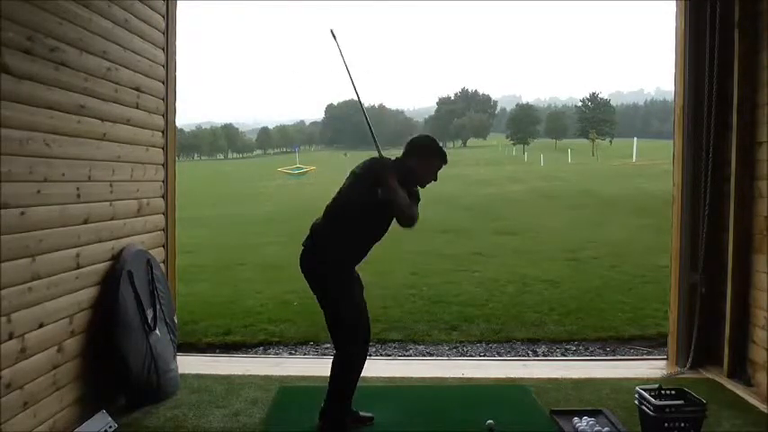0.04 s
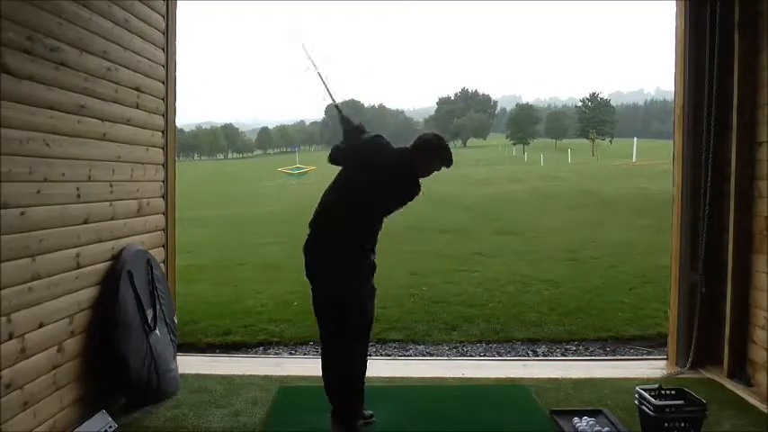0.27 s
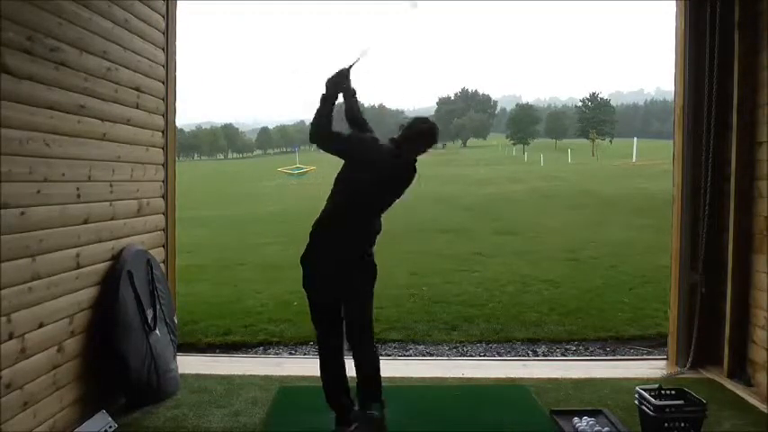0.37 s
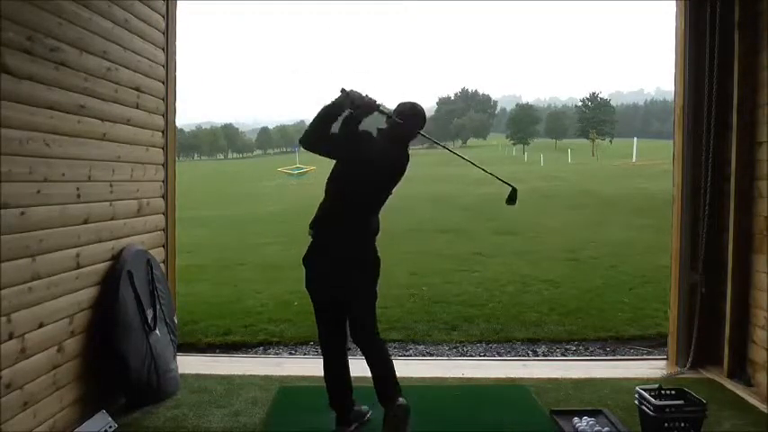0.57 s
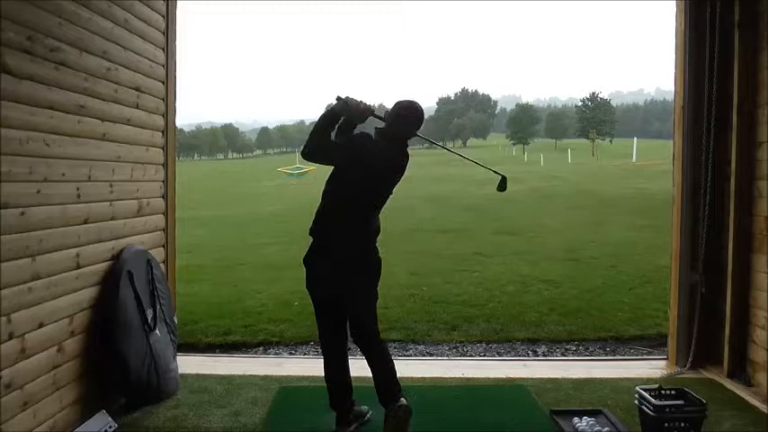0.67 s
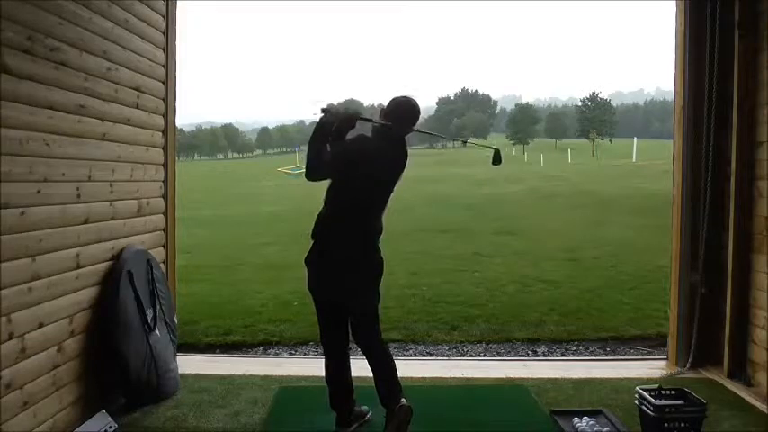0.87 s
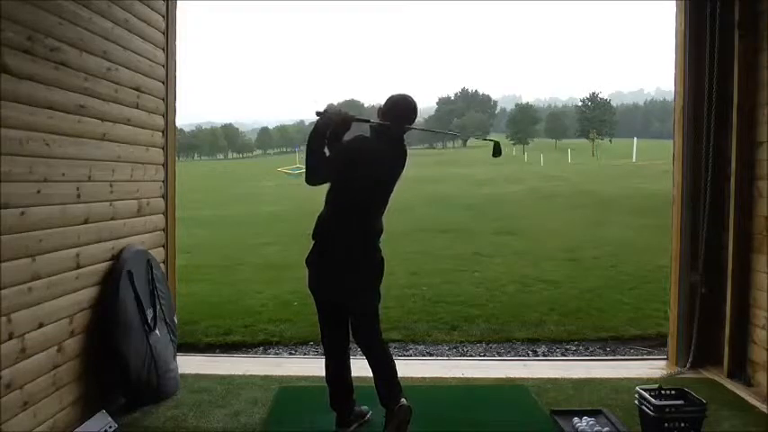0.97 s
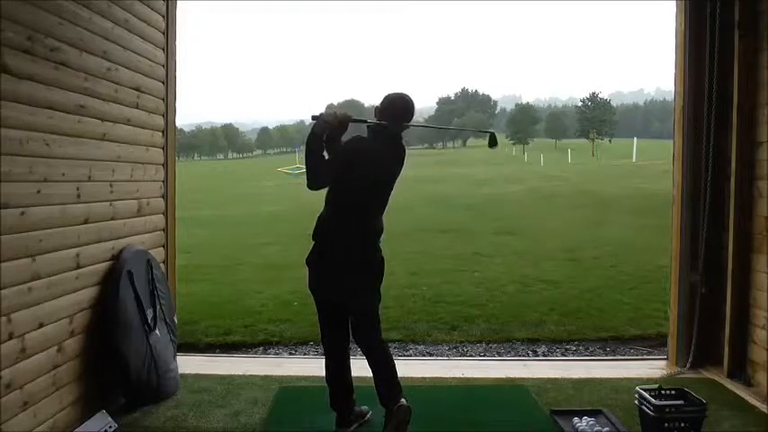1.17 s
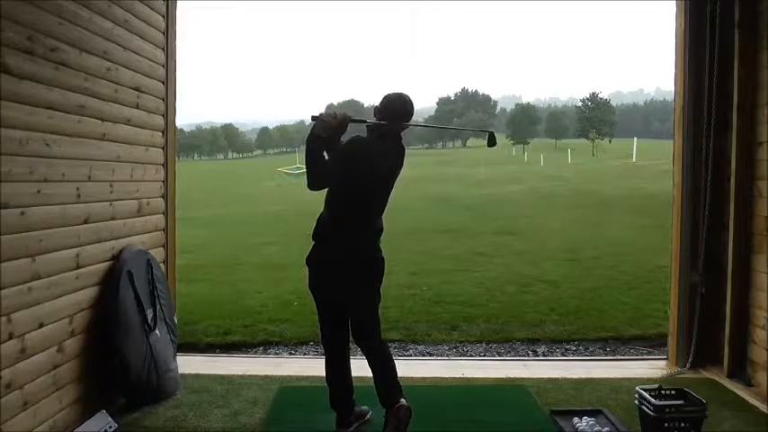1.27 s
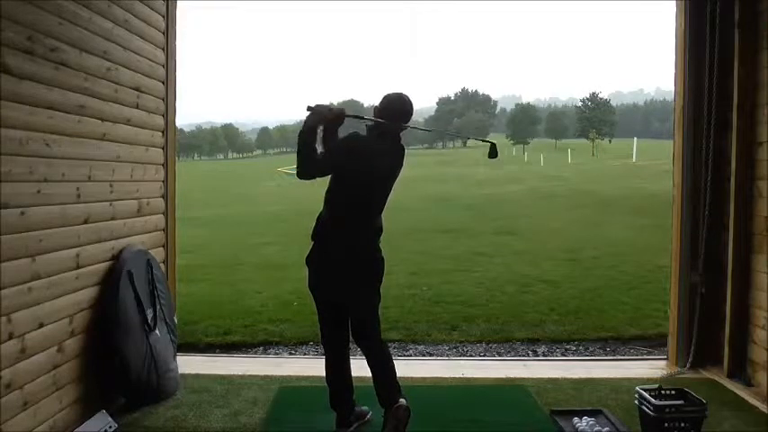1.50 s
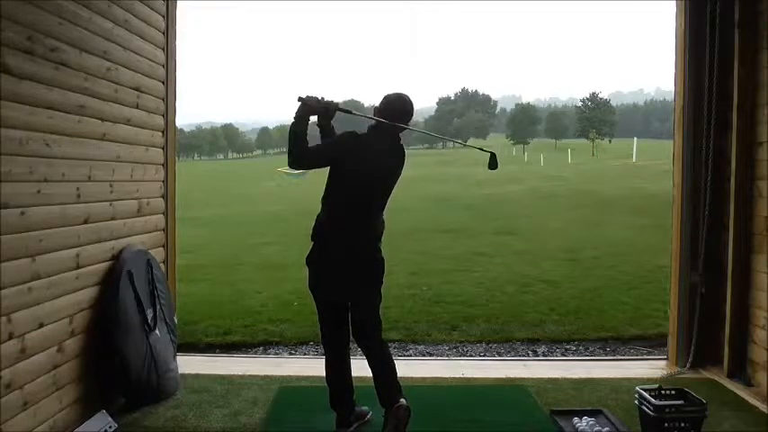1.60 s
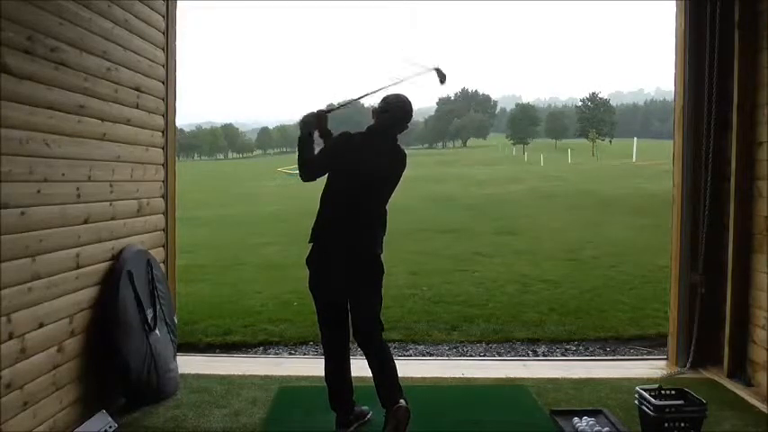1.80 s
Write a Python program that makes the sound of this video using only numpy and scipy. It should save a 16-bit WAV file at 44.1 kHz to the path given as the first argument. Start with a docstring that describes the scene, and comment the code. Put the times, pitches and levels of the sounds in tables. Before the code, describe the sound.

Golf shot: fast rising swish, sharp crack of ball and mat, short woody echo, faint birds after

```python
"""Golf strike in a timber bay

At the microphone pair in an open timber bay, a club's shaft sheds vortices in a rising whoosh (tone and noise).
The head cracks into the ball and scuffs the mat (noise bursts, damped sines); the walls ring on (decaying noise).
Outside are a soft wash of air and far traffic (coloured noise), drips from the eaves and birds (gliding sines).
The recorder's gain turns down after the blow and recovers slowly."""
import sys
import numpy as np
from scipy import signal
from scipy.fft import rfft, irfft, next_fast_len
from scipy.io import wavfile
from scipy.ndimage import uniform_filter1d, map_coordinates

SR = 44100
rng = np.random.default_rng(int(sys.argv[2]) if len(sys.argv) > 2 else 0)


def field_ratio(decibels):
    """Amplitude ratio for a level in dB (20 dB per decade); scalars and array-likes work."""
    return 10 ** (np.asarray(decibels, dtype=float) / 20)


def persist_wave(psi):
    """Save psi, clipped to +-1, as 16-bit WAV."""
    counts = np.round(np.clip(psi, -1, 1) * 32767).astype(np.int16)
    wavfile.write(sys.argv[1], SR, np.atleast_2d(counts).T)


N = 81585

# the shaft's whoosh through the downswing: (time [s], level [dB], vortex pitch [Hz])
SWING = [(0.129, -49.5, 300), (.15, -44.5, 330), (.162, -35.5, 349.5), (.171, -50, 368),
         (0.179, -32, 413.6), (.192, -34.5, 447), (.202, -21, 523), (.213, -20.5, 555.6),
         (.225, -12, 596.5), (.229, -19.5, 601), (.234, -14, 610.3), (.243, -16.5, 621.5),
         (0.2485, -6.5, 638), (0.2527, -14, 621)]
# hiss of air round the head: (frequency [Hz], relative level per Hz [dB])
HEAD_AIR = [(250, -32.5), (500, 0), (900, 0.5), (2000, -7.5), (2900, -17), (3500, -13), (6450, -16),
            (11800, -27.5), (15900, -43)]
# how alike the hiss is at the two microphones: (frequency [Hz], likeness [0-1])
WHOOSH_ALIKE = [(300, 1), (1400, 0.81), (7000, 0.72), (15000, .1)]
LEAD_DB_PER_S = 120  # swell before the first point of the swing
STOP_S, STOP_DB = 0.0035, 7.8  # once the ball is struck, fades by STOP_DB every STOP_S
TONE_FROM_S, TONE_GROWS_S = 0.13, 0.02  # shedding locks into a tone once the shaft is fast enough
WAVER_RAD = 0.8  # uneven shedding
FLUTTER_HZ, FLUTTER_DB = 210, -1.5  # speed of the flutter round the tone, level against the tone
HISS_AGAINST_TONE_DB = -10  # at the loudest point of the swing
HISS_GROWTH = 0.65  # dB of hiss per dB of tone
WHOOSH_CUT_HZ = 294  # the thin shaft radiates little below this


def whoosh():
    """Vortices shed by the shaft: a wavering tone, flutter around it and hiss, all following the swing."""
    t = np.arange(N) / SR
    s, db, hz = np.transpose(SWING)
    lead_db = LEAD_DB_PER_S * np.clip(s[0] - t, 0, None)
    stop_db = STOP_DB * np.clip(t - s[-1], 0, None) / STOP_S
    level_db = np.interp(t, s, db) - lead_db - stop_db
    locked = 1 / (1 + np.exp((TONE_FROM_S - t) / TONE_GROWS_S))

    carrier = np.exp(2j * np.pi * np.cumsum(np.interp(t, s, hz)) / SR)
    tone = np.sqrt(2) * np.real(carrier * np.exp(1j * WAVER_RAD * wobble(129.4)))

    # one flutter shared by both microphones, plus one of its own for each
    knots = 2 * FLUTTER_HZ
    flutter = np.array([np.real(carrier * (wobble(knots) + 1j * wobble(knots))) for _ in range(3)])
    flutter = unit(flutter[0] + 0.5 * flutter[1:])

    hiss_db = HISS_AGAINST_TONE_DB + (HISS_GROWTH - 1) * (level_db - db.max())
    hiss = rush(HEAD_AIR, WHOOSH_ALIKE, patchy_db=0.5) * field_ratio(hiss_db)
    whole = locked * (tone + field_ratio(FLUTTER_DB) * flutter) + hiss
    return high_pass(field_ratio(level_db) * whole, WHOOSH_CUT_HZ)


# contacts of the head with ball and mat: (time [s], level [dB], burst decay [s])
BLOWS = [(0.2523, -12.5, 0.0012), (0.2532, -1.5, 0.0017), (0.2557, -5.5, 0.0019), (.2575, -9.5, .003)]
# colour of each gritty burst: (frequency [Hz], relative level per Hz [dB])
CRACK = [(100, -43), (200, -7.5), (500, -8), (1860, -3.5), (3900, -7.5), (6100, -6), (8200, -9),
         (11200, -16.5), (13000, -14.5), (15500, -16), (16500, -60)]
# how alike the bursts are at the two microphones: (frequency [Hz], likeness [0-1])
CRACK_ALIKE = [(200, 0.45), (1000, 0.74), (5000, .85), (9000, .4), (13000, 0.7)]
# ringing modes of the club head: (frequency [Hz], relative level [dB], t60 [s])
HEAD = [(1044, -7.5, .02), (1440, 0.5, .02), (1970, -9, .025), (6140, 0, 0.021), (12860, -6, .008)]
# thud of mat and floor: (frequency [Hz], level [dB], t60 [s])
THUD = [(190, -16, .035), (260, -20, .025)]
# cross mode of the bay: (frequency [Hz], level [dB], t60 [s])
BOOM = [(99.1, -23.5, .38)]
THUD_START_S = 0.2535
THUD_LEFT = -0.2  # the thud reaches the left microphone weak and reversed
BOOM_START_S, BOOM_RISE_S = 0.258, 0.021
BOOM_LEFT = -0.3  # the boom is opposed at the two microphones
BLOW_CUT_HZ = 130  # the small head radiates little below this


def strike():
    """Each contact is a gritty burst that also rings the head; the mat thuds and the bay booms."""
    t = np.arange(N) / SR
    blow = ring(THUD, THUD_START_S, attack_s=0.002) * [[THUD_LEFT], [1]]
    for s, db, burst_s in BLOWS:
        age = np.clip(t - s, 0, None)
        envelope = (1 - np.exp(-age / 0.00024)) * np.exp(-age / burst_s)
        grit = rush(CRACK, CRACK_ALIKE, patchy_db=2) * envelope
        blow = blow + field_ratio(db) * (grit + 0.3 * ring(HEAD, s, attack_s=0.0002))
    boom = ring(BOOM, BOOM_START_S, BOOM_RISE_S) * [[BOOM_LEFT], [1]]
    return high_pass(blow, BLOW_CUT_HZ) + boom


WHOOSH_BAY_DB = -23


def bay(air):
    """The whoosh and each contact, taken as an impulse of the burst's energy, echo in the bay."""
    out = field_ratio(WHOOSH_BAY_DB) * signal.fftconvolve(air.mean(0)[None], bay_tail(), axes=1)[:, :N]
    for s, db, burst_s in BLOWS:
        impulse = field_ratio(db) * np.sqrt(burst_s * SR / 2)
        out = out + impulse * delayed(bay_tail(), s)
    return out


# how long the timber walls ring: (frequency [Hz], t60 [s])
BAY = [(100, 1), (300, 0.63), (600, 0.49), (1000, 0.51), (3000, .4), (7000, 0.37), (12000, 0.27),
       (16000, 0.18)]
# colour of the walls' answer: (frequency [Hz], relative level [dB])
BAY_COLOUR = [(100, -16), (250, -7.5), (600, -0.5), (2000, 3), (3000, -1.5), (5000, 2), (9000, -4.5),
              (12000, -12.5), (15500, -22)]
# how alike the answer is at the two microphones: (frequency [Hz], likeness [0-1])
BAY_ALIKE = [(100, 0.87), (640, 0.88), (1400, .65), (7000, 0.73), (15000, 0)]
BAY_GAP_S, BAY_FILL_S = 0.004, 0.0047  # wait for the first answer, time to fill


def bay_tail():
    """The timber walls' answer to an impulse; each frequency dies at its own speed."""
    hz, t, z = signal.stft(rng.standard_normal((2, N + 256)), SR, nperseg=256)
    decay = field_ratio(-60 * t / along(BAY, hz)[:, None])
    tail = signal.istft(z * decay, SR, nperseg=256)[1][:, :N]
    tail = tail * (1 - np.exp(-np.arange(N) / SR / BAY_FILL_S))
    tail = paired(delayed(tail, BAY_GAP_S), BAY_COLOUR, BAY_ALIKE)
    return tail / np.linalg.norm(tail[0])


# hollow drips from the eaves: (time [s], level [dB], pitch [Hz])
DRIPS = [(1.372, -37.5, 800), (1.555, -40, 330), (1.745, -50, 1054), (1.785, -38, 1026), (1.832, -40, 1065)]
DRIP_T60_S = 0.073


def drips():
    """Short soft-edged plops, each one damped sine."""
    return sum(ring([(hz, db, DRIP_T60_S)], s, attack_s=0.0036) for s, db, hz in DRIPS)


# held bird whistles: (start [s], length [s], from pitch [Hz], to pitch [Hz], level [dB])
WHISTLES = [(1.02, 0.035, 3900, 3750, -56), (1.04, 0.079, 3970, 4035, -51), (1.15, 0.077, 1670, 1710, -51),
            (1.245, 0.12, 1720, 1690, -47.5), (1.36, 0.047, 1680, 1610, -48), (1.45, .03, 2040, 1920, -52),
            (1.475, .08, 1720, 1607, -47.5)]
# buzzy bird chirps: (start [s], length [s], from pitch [Hz], to pitch [Hz], level [dB])
CHIRPS = [(.685, 0.019, 4700, 4950, -59), (.705, 0.016, 3400, 3350, -57.5), (.86, .02, 4700, 4600, -58.5),
          (.87, 0.026, 3450, 3450, -57), (.945, .035, 4500, 3160, -50), (.988, .03, 2950, 4260, -48),
          (1.09, 0.062, 5200, 3680, -51.5), (1.15, 0.083, 3250, 3355, -54), (1.235, .02, 3900, 4100, -56),
          (1.29, .04, 4050, 3430, -59), (1.41, 0.055, 3300, 3070, -57.5), (1.455, 0.033, 3600, 3520, -58),
          (1.61, 0.037, 3800, 3130, -58), (1.675, 0.049, 3000, 3800, -55.5)]


def birds():
    """Clear whistles and buzzy chirps: a wider phase swing makes the buzz."""
    whistles = song(WHISTLES, waver_rad=0.25, echo_db=-10)
    chirps = song(CHIRPS, waver_rad=1.25, echo_db=-1.5)
    return whistles + chirps


WAVER_RATE = 350  # random knots of the unsteady pitch [per second]
FIELD_T60_S = 0.35


def song(notes, waver_rad, echo_db):
    """Gliding notes with soft ends and unsteady pitch, in echoes from the trees."""
    out = np.zeros(N)
    waver = waver_rad * wobble(WAVER_RATE)
    for s, length_s, from_hz, to_hz, db in notes:
        first = int(s * SR)
        u = np.arange(int(length_s * SR)) / (length_s * SR)  # 0 to 1 through the note
        glide_hz = from_hz + (to_hz - from_hz) * u
        phase = 2 * np.pi * np.cumsum(glide_hz) / SR + waver[first:][:len(u)]
        out[first:][:len(u)] += field_ratio(db) * np.sin(np.pi * u) ** 0.41 * np.sin(phase)
    out = out * field_ratio(1.9 * wobble(80))  # uneven loudness
    t = np.arange(SR // 2) / SR
    echo = rng.standard_normal((2, len(t))) * field_ratio(-60 * t / FIELD_T60_S)
    echo = echo / np.linalg.norm(echo[0])
    return out + field_ratio(echo_db) * signal.fftconvolve(out[None], echo, axes=1)[:, :N]


# traffic and wind far off: (frequency [Hz], relative level per Hz [dB])
FAR = [(15, -49), (30, -12.5), (124, -5.5), (231, -6), (352, -4.5), (580, -5.5), (884, -3.5), (1400, -7.5),
       (2000, -11.5), (2500, -20), (4000, -22.5), (7000, -60)]
# slow swell of that wash: (time [s], level [dB])
FAR_LEVEL = [(0, -55), (.12, -52), (.6, -50), (.85, -49), (1.2, -44.5), (1.5, -45), (1.85, -47)]
# leaves and drizzle: (frequency [Hz], relative level per Hz [dB])
HISS = [(1300, -10), (2200, -10.5), (2800, -6), (4900, -2), (7200, -9.5), (8500, -10.5), (11000, -13),
        (14000, -16.5), (15000, -28), (15900, -64.5)]
# how alike the outdoors is at the two microphones: (frequency [Hz], likeness [0-1])
OUT_ALIKE = [(60, 0.65), (640, 0.61), (1400, 0.5), (3100, 0.65), (6800, 0.73), (15000, .1)]
HISS_DB = -55


def outdoors():
    """Noise of many far sources: a low wash that swells slowly, under a steady hiss."""
    s, db = np.transpose(FAR_LEVEL)
    far_db = np.interp(np.arange(N) / SR, s, db) + 0.55 * wobble(12.02)
    far = field_ratio(far_db) * rush(FAR, OUT_ALIKE, patchy_db=0.64)
    return far + field_ratio(HISS_DB) * rush(HISS, OUT_ALIKE, patchy_db=2.16)


def ring(modes, start_s, attack_s):
    """Damped sines set off at one moment, a little different at each microphone."""
    t = np.clip(np.arange(N) / SR - start_s, 0, None)
    out = 0
    for hz, db, t60 in modes:
        mode_db = db + rng.normal(0, 1.5, (2, 1)) - 60 * t / t60
        out = out + field_ratio(mode_db) * np.sin(2 * np.pi * hz * t)
    return out * (1 - np.exp(-t / attack_s))


def rush(spectrum, alike, patchy_db):
    """Stereo noise of rms 1 with patches of random gain in time and frequency."""
    z = signal.stft(rng.standard_normal((2, N + 512)), nperseg=512)[2]
    field = uniform_filter1d(rng.standard_normal(z.shape[1:]), size=5, axis=0)
    field = uniform_filter1d(field, size=10, axis=1)
    noise = signal.istft(z * field_ratio(patchy_db * unit(field)), nperseg=512)[1][:, :N]
    return unit(paired(noise, spectrum, alike))


def paired(pair, spectrum, alike):
    """Two unrelated signals coloured and mixed to a left and right of given likeness."""
    def response(hz):
        turn = np.arccos(np.clip(along(alike, hz), -1, 1)) / 2
        return field_ratio(along(spectrum, hz)) * [np.cos(turn), np.sin(turn)]

    mid, side = filtered(pair, response)
    return np.array([mid + side, mid - side])


def filtered(x, response):
    """x times a response of frequency."""
    m = next_fast_len(N + SR // 2)
    return irfft(rfft(x, m) * response(np.fft.rfftfreq(m, 1 / SR)), m)[..., :N]


def high_pass(x, cut_hz):
    """Causal fourth-order low cut."""
    return signal.sosfilt(signal.butter(N=4, Wn=cut_hz, btype="high", fs=SR, output="sos"), x)


def delayed(pair, s):
    """Both channels later by s seconds."""
    return np.pad(pair, ((0, 0), (int(s * SR), 0)))[:, :N]


def wobble(rate):
    """A smooth random curve, rate knots a second."""
    return map_coordinates(rng.standard_normal(int(N * rate / SR) + 4), [np.arange(N) * rate / SR])


def along(points, hz):
    """(Hz, value) points on a log axis."""
    f, v = np.transpose(points)
    return np.interp(np.log(hz + 1), np.log(f + 1), v)


def unit(x):
    """Scaled to rms 1."""
    return x / np.sqrt(np.mean(x ** 2) + 1e-20)


def scene():
    """Club and ball in the bay, field beyond."""
    air = whoosh()
    return air + strike() + bay(air) + birds() + drips() + outdoors()


def low_pass(x):
    """Removes everything above the highest recorded frequency."""
    return signal.sosfilt(signal.butter(12, 16020, fs=SR, output="sos"), x)


# microphone colour: (frequency [Hz], level [dB])
MIC = [(25, -7), (90, -0.5), (2200, 0), (2600, -2), (2900, -1.5), (3200, 0.5), (16000, 0)]
# balance of the microphone pair: (frequency [Hz], left minus right [dB])
BALANCE_DB = [(60, 1.5), (180, 0), (550, -1), (1650, 1.0), (4970, -1.5), (15000, -1)]
GAIN_KNEE_DB, GAIN_SLOPE = -22, 0.5  # level where the gain starts to drop, dB of cut per dB above it
GAIN_ATTACK_S, GAIN_RECOVER_DB_PER_S = 0.083, 1


def record(dry):
    """Gain control that ducks after loud sound and creeps back, then microphone colour and balance."""
    t = np.arange(N) / SR
    power = np.abs(uniform_filter1d(np.mean(dry ** 2, 0), size=441))
    loud_db = 10 * np.log10(power + 1e-12)
    cut_db = GAIN_SLOPE * np.clip(loud_db - GAIN_KNEE_DB, 0, None)
    # hold each peak of the cut and let it go at a steady rate
    recovery_db = GAIN_RECOVER_DB_PER_S * t
    cut_db = np.maximum.accumulate(cut_db + recovery_db) - recovery_db
    # the shifted average makes the gain fall only after the sound
    size = int(GAIN_ATTACK_S * SR)
    cut_db = np.pad(np.clip(cut_db, 0, None), (size // 2, 0))[:N]
    cut_db = uniform_filter1d(cut_db, size=size)

    def microphones(hz):
        return field_ratio(along(MIC, hz) + along(BALANCE_DB, hz) * [[0.5], [-0.5]])

    mix = filtered(dry * field_ratio(-cut_db), microphones)
    return low_pass(mix)


dry = scene()
out = record(dry)
persist_wave(out)
```